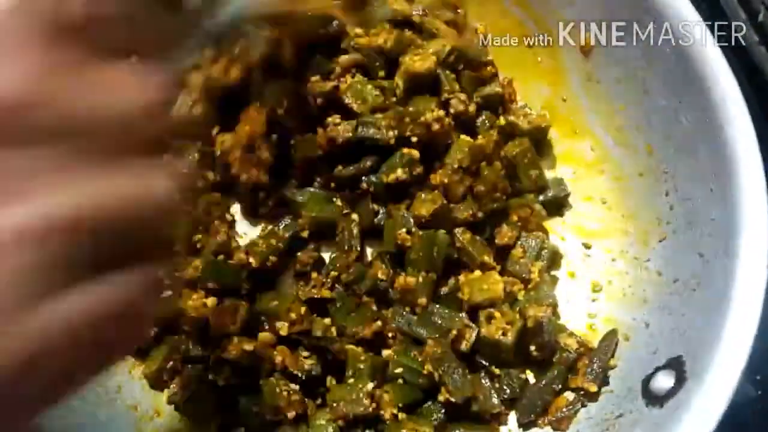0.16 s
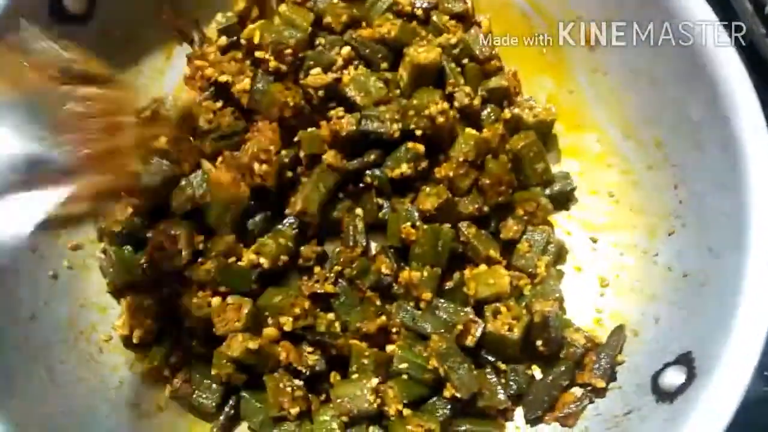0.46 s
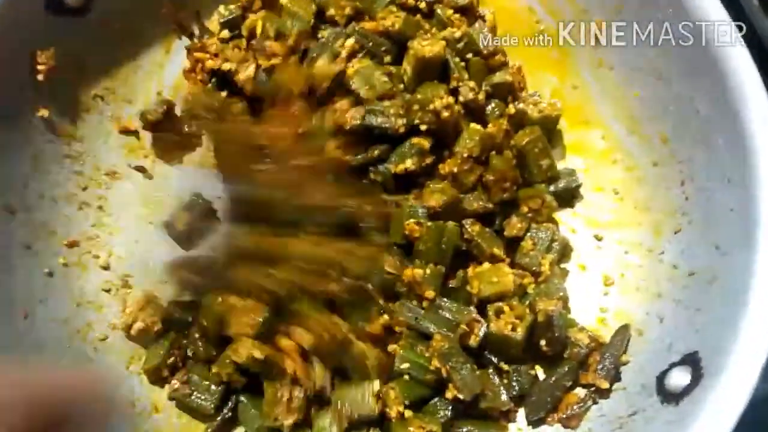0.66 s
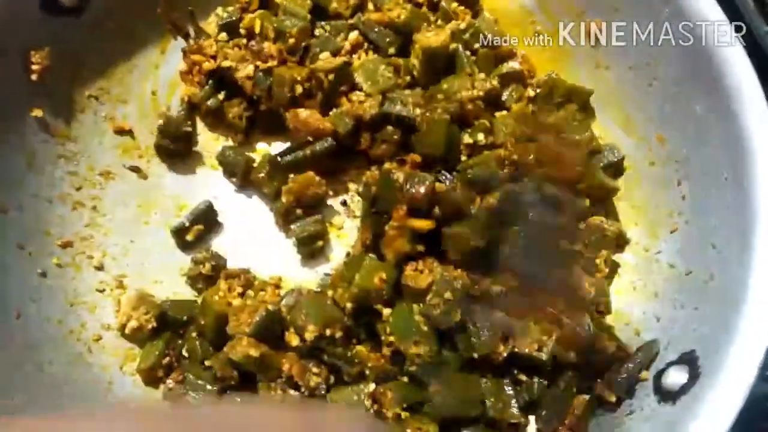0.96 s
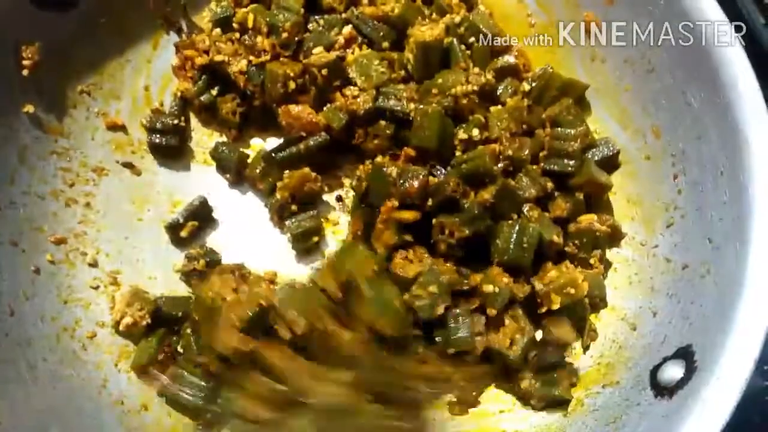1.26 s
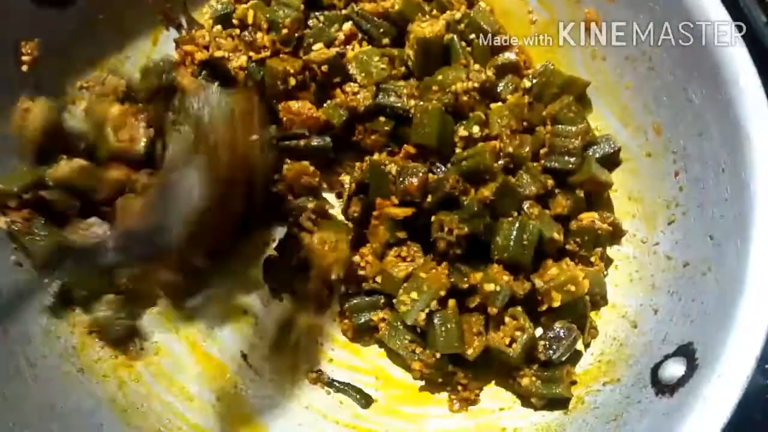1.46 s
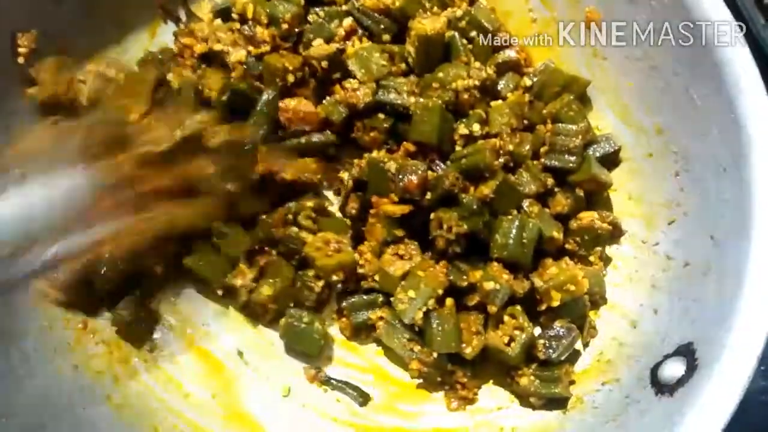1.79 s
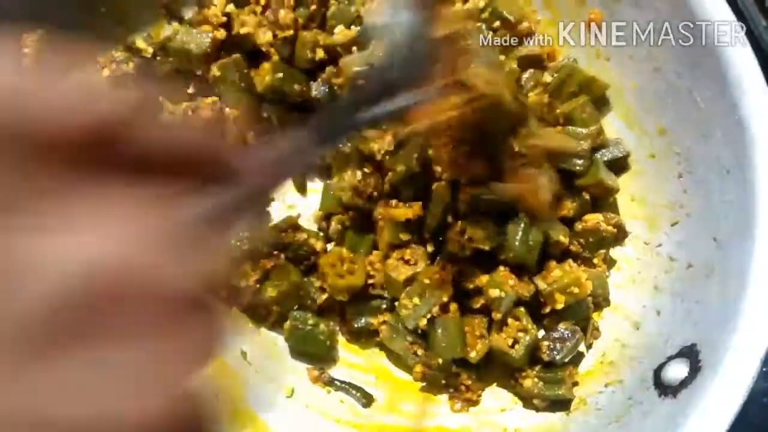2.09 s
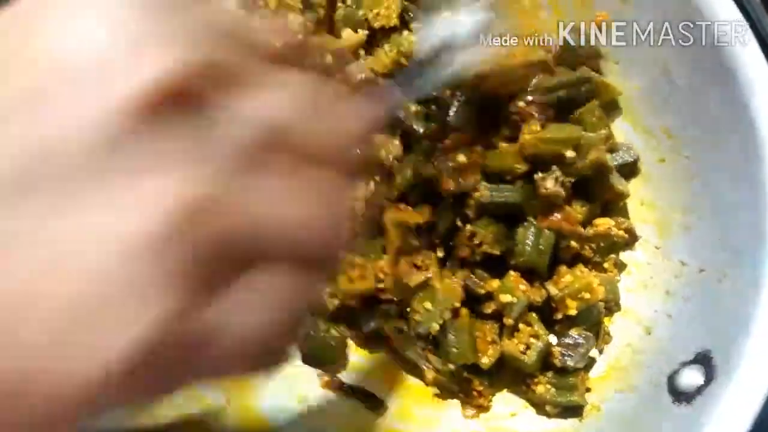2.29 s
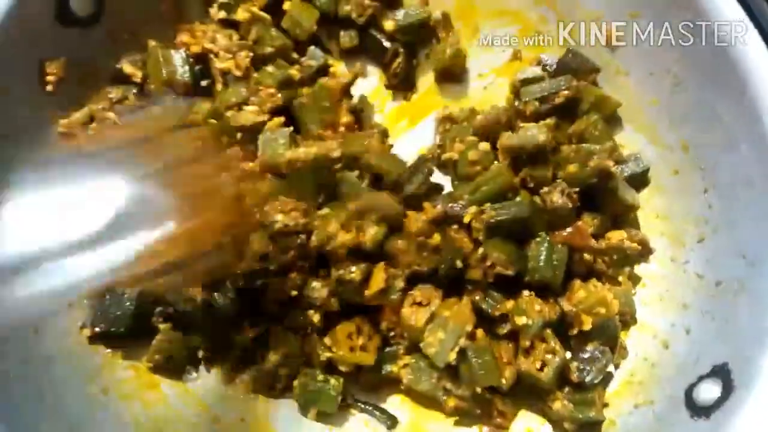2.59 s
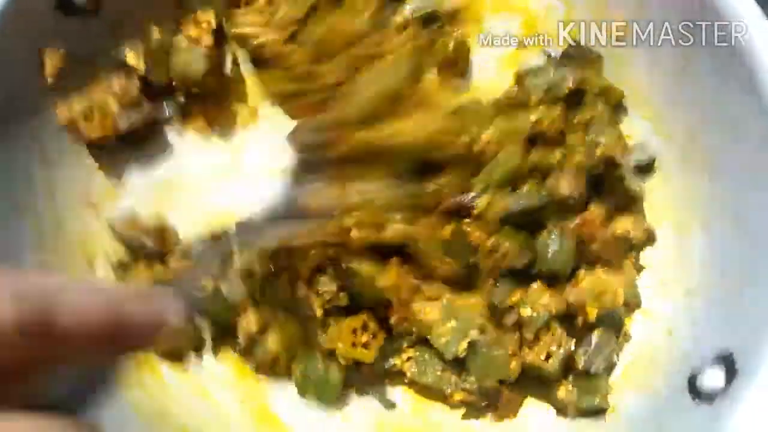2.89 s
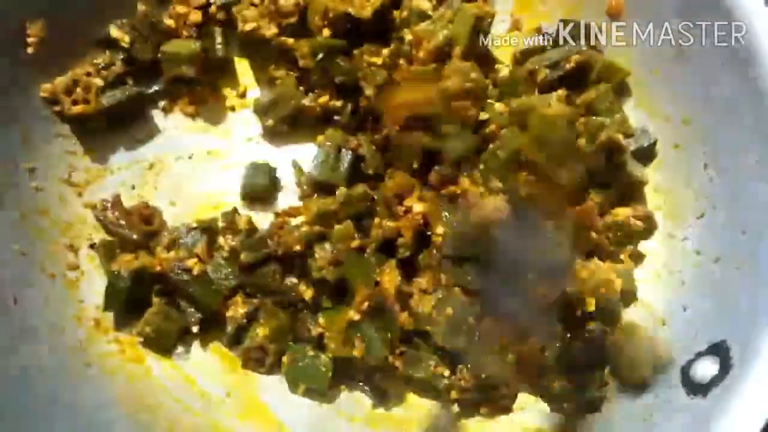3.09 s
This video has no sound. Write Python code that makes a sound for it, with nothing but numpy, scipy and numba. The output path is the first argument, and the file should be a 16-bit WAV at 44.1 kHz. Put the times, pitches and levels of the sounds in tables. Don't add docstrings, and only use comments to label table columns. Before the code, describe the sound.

A steel spoon scrapes and clinks in a thin metal pan, stirring soft chopped vegetables

```python
import sys
import numpy as np
from scipy import signal
from scipy.io import wavfile
from scipy.ndimage import uniform_filter1d
from numba import njit

SR = 44100
rng = np.random.default_rng(int(sys.argv[2]) if len(sys.argv) > 2 else 0)


def convert_level_to_amplitude(level_db):
    exponent = np.asarray(level_db, float) / 20
    return 10 ** exponent


def transcribe(signal):
    frames = np.atleast_2d(signal).T
    limited = np.clip(frames, -1, 1)
    pcm = np.round(limited * 32767).astype(np.int16)
    wavfile.write(sys.argv[1], SR, pcm)


N = 143325


def scrape(t):
    # (time [s], pressure [dB], contact resonance [Hz], spoon brightness [dB])
    stroke_0 = [(0.012, -59.5, 815, 22.5), (0.086, -61.5, 1410, 5.5), (0.1, -46.5, 874, 9.5),
                (.125, -52, 796, 7.5), (0.168, -50, 1780, -1.5), (0.187, -39, 1730, -1)]
    stroke_1 = [(0.192, -36.5, 720, 2.5), (0.239, -38.5, 810, 2.5), (0.261, -32, 1380, -3.5),
                (.315, -33.5, 1290, -4.5), (0.327, -36, 1240, -3.5), (0.343, -26, 1360, -10),
                (.36, -32.5, 1490, -1.5), (0.384, -30, 1390, -7.5), (0.421, -35, 1550, -3.5)]
    stroke_2 = [(0.828, -47, 990, -30), (0.869, -58.5, 980, -5), (0.904, -60, 1960, 8),
                (1.002, -74, 1340, -9)]
    stroke_3 = [(1.321, -72, 1920, 5.1), (1.361, -52.5, 1850, 6.1), (1.451, -60.5, 1730, 2.3),
                (1.479, -46, 780, 5.9), (1.508, -46.5, 723, 1.2), (1.599, -66.5, 795, 1.1)]
    stroke_4 = [(1.951, -30.5, 2020, 1.5), (1.968, -32, 2050, 5), (1.985, -28.5, 2090, -1),
                (2.0, -28, 1980, 0.5), (2.013, -32.5, 2280, 2), (2.023, -30, 3170, 0.5),
                (2.043, -29.5, 1970, -7), (2.058, -38, 1900, 2.5)]
    stroke_5 = [(2.424, -30.5, 1610, -1.5), (2.455, -37, 1390, -7.5), (2.477, -25.5, 1390, -10),
                (2.49, -28, 1450, -1), (2.5, -36.5, 1290, -1.5), (2.515, -35, 1010, 2),
                (2.54, -39, 930, -2.5), (2.552, -38.5, 900, -3.5), (2.577, -44.5, 850, -2)]
    stroke_6 = [(2.912, -34, 890, 7), (2.954, -39, 2070, -3), (2.972, -28.5, 1900, -1.5),
                (2.989, -24.5, 1490, -5), (3.004, -25, 1840, -1), (3.019, -30.5, 1900, 1.5),
                (3.033, -42, 1680, 7.5), (3.05, -47, 1790, 7)]
    # (thud [dB], release [s], settling level [dB], settling time [s])
    food = [
        (-1.5, 0.014, -12.5, 0.06),
        (-14, 0.024, -24.5, 0.3),
        (-11, 0.033, -7.5, 0.054),
        (-11, 0.052, -20, 0.061),
        (-22, 0.023, -29, 0.17),
        (-7.5, 0.01, -28, 0.23),
        (-38, 0.02, -30, 0.16),
    ]
    strokes = (stroke_0, stroke_1, stroke_2, stroke_3, stroke_4, stroke_5, stroke_6)
    grains_per_s, grain_spread_db = 5000, 2.5
    slip_db, slip_rate_hz = 1.2, 190
    contact_q = 3.6
    thud_hz, settle_hz = 505, 8400
    hiss_hz, hiss_db = 4550, -9

    draw = rng.random((3, N))
    grains = draw[0] < grains_per_s / SR
    grit = grains * np.sign(draw[1] - 0.5) * convert_level_to_amplitude(-grain_spread_db * np.log(1 - draw[2]))
    rough = unit(grit) + 0.74 * rng.standard_normal(N)
    force = unit(rough * convert_level_to_amplitude(slip_db * walk(slip_rate_hz)))
    thud = unit(band(band(force, thud_hz, 1.7), thud_hz, 0.5))
    rustle = convert_level_to_amplitude(0.25 * walk(12)) * thin(band(rng.standard_normal(N), settle_hz, 1.0))

    out, edge = np.zeros(N), np.zeros(N)
    for rows, (thud_db, release, settle_db, settle_s) in zip(strokes, food):
        s, db, hz, bright_db = np.array(rows, float).T
        begun = t >= s[0]
        after = np.maximum(t - s[-1], 0)
        contact_hz = np.interp(t, s, hz)
        gain = begun * convert_level_to_amplitude(np.interp(t, s, db)) * np.exp(-after / release)
        bright = gain * convert_level_to_amplitude(np.interp(t, s, bright_db))
        pan, spoon = bodies(s[0])
        shaken = svf(force, contact_hz, contact_q)
        out += thin(through(gain * shaken, pan)) / through(shaken, pan).std()
        out += 0.4 * through(bright * force, spoon)
        out += gain * convert_level_to_amplitude(thud_db) * (1000 / contact_hz) ** 2 * thud
        out += begun * bright.max() * convert_level_to_amplitude(settle_db) * np.exp(-(after / settle_s) ** 2) * rustle
        edge += bright
    return out + convert_level_to_amplitude(hiss_db) * thin(band(edge * force, hiss_hz, 0.82))


def taps():
    # (time [s], peak level [dB], contact resonance [Hz], pan share [dB])
    landings = [(0.012, -47, 4700, -17.5), (0.097, -21, 3630, -9), (.172, -44.5, 6540, -18),
                (0.193, -18, 3460, -0.5), (.226, -24, 3550, 4), (.25, -22.5, 3600, -3),
                (.346, -28, 2200, -12), (.823, -42, 1600, 12.5), (.899, -38.5, 1940, -3.5),
                (1.471, -33, 3640, 8.5), (1.502, -39, 800, -1), (1.952, -10, 2220, -7.5),
                (2.036, -23.5, 2100, 0.5), (2.042, -22, 2500, -11), (2.415, -35, 770, -11),
                (2.422, -14.5, 1530, 0), (2.491, -20.5, 1520, -3), (2.511, -29.5, 2700, 7),
                (2.547, -29.5, 1100, -6), (2.910, -14, 2770, 0.5), (2.934, -13.5, 2560, -21),
                (2.972, -11.5, 1750, -8)]
    knock_q, spoon_db = 4, -7.5
    out = np.zeros(N + SR)
    knock_t = np.arange(300) / SR
    for s, db, hz, pan_db in landings:
        pan, spoon = bodies(s)
        knock = np.sin(2 * np.pi * hz * knock_t) * np.exp(-np.pi * hz / knock_q * knock_t)
        pan_ring = 0.5 * pan + 0.77 * signal.fftconvolve(pan, knock)[:len(pan)]
        hit = convert_level_to_amplitude(pan_db) * pan_ring + convert_level_to_amplitude(spoon_db) * spoon
        hit[:300] += 0.87 * knock
        start = int(s * SR)
        out[start:start + len(hit)] += convert_level_to_amplitude(db) * hit
    return thin(out[:N])


def catches(t):
    # (time [s], mode [Hz], length [s], level [dB])
    blips = [(0.098, 900, 0.0087, -45), (0.185, 1730, .006, -41), (.231, 875, 0.0045, -44),
             (.25, 1200, 0.0035, -33.5), (0.269, 1436, .008, -29.5), (.348, 1220, 0.0046, -26.5),
             (0.37, 1900, 0.011, -31.5), (.393, 1160, 0.0027, -26), (1.964, 900, 0.01, -33.5),
             (1.999, 1100, 0.0082, -30.5), (2.045, 1900, 0.0042, -22), (2.065, 1100, 0.0031, -37),
             (2.49, 1180, .004, -30), (2.511, 3550, 0.0026, -31), (2.548, 3490, .003, -36),
             (2.574, 3420, .003, -40.5), (2.915, 900, 0.0092, -30.5), (2.988, 1100, 0.0036, -26.5),
             (2.994, 1840, 0.0033, -21), (3.006, 1850, 0.0036, -22), (3.07, 1810, 0.0042, -34),
             (3.088, 1870, 0.011, -49)]
    tick_glide = 0.13
    out = np.zeros(N)
    for s, hz, length, db in blips:
        d = (t - s) / length
        swell = np.exp(-np.where(d < 0, 2.06 * d ** 2, 1.16 * np.abs(d) ** 0.96))
        glide = 1 + (hz > 3000) * tick_glide * d / 2
        out += convert_level_to_amplitude(db) * np.sqrt(2) * swell * np.sin(2 * np.pi * hz * (t - s) * glide)
    return out


def rim(t):
    # (time [s], rise [s], mode [Hz], level [dB])
    rings = [(.44, 0.041, 1904, -37), (.45, 0.041, 1900, -55), (.45, 0.027, 1226, -52.5),
             (.46, .03, 1238, -66), (.43, 0.011, 684, -56), (1.33, 0.022, 1905, -53.5),
             (2.05, 0.0087, 1900, -52), (2.576, 0.035, 1225, -44), (2.6, 0.045, 690, -62.5),
             (3.02, 0.012, 684, -55), (3.035, 0.0083, 1908, -51)]
    # (mode [Hz], 60 dB decay [s])
    rim_decay = [(684, 0.92), (1222, 1.32), (1787, 0.16), (1900, 0.51)]
    waver_db = 1.5
    out = 0
    f, t60 = np.array(rim_decay).T
    for s, rise, hz, db in rings:
        d = np.maximum(t - s, 0)
        swell = np.sin(np.pi / 2 * np.minimum(d / rise, 1)) ** 2
        decay = np.exp(-np.log(1000) * np.maximum(d - rise, 0) / np.interp(hz, f, t60))
        waver = convert_level_to_amplitude(waver_db * walk(39.67))
        out = out + convert_level_to_amplitude(db) * np.sqrt(2) * swell * decay * waver * np.sin(2 * np.pi * hz * d)
    return out


def bodies(s):
    # (mode [Hz], width [Hz], first four strokes [dB], 5th
    # [dB], 6th [dB], 7th [dB])
    pan_modes = [(900, 88, 5, 3.5, 1, -4), (1100, 70, -8, -4.5, -1.5, -4.5), (1160, 20, -4, -12, -6, -22),
                 (1381, 70, -5, -26, -4.5, -15.5), (1794, 34, -1, -3, -0.5, -4.5),
                 (1900, 53, 5.5, -1, 1.5, -7.5), (2135, 41, -3, -1.5, -14, -5.5),
                 (2264, 59, -11.5, -7.5, -2, -7), (2440, 70, 0, -11.5, -3, -5),
                 (2620, 65, -5, -12, -4.5, -6), (3160, 88, -3, -7.5, -3, -10.5),
                 (3480, 180, -6.5, -3.5, -6, -24)]
    food_shifts = [1.7, 2.3, 2.8]
    # (mode [Hz], width [Hz], level [dB])
    spoon_flat = [(2850, 66, -0.5), (3550, 44, 4.5), (4597, 177, 0.5), (5900, 20, 1), (6480, 46, -2),
                  (8230, 210, -3), (9450, 51, -1.5), (11200, 48, -6.5), (13100, 24, -4)]
    # (mode [Hz], width [Hz], level [dB])
    spoon_edge = [(4087, 55, -7), (3630, 9.1, -3), (4690, 160, -2), (5450, 55, 0.5), (6325, 115, -4),
                  (7050, 21, -0.5), (7940, 860, -10), (12600, 43, -24)]
    pan_dense_t60_s, pan_dense_db = 0.09, -3
    spoon_dense_t60_s, spoon_dense_db, spoon_tilt_db = 0.13, -6.5, 12

    a, b, c = rng.random((3, 200))
    level_column = 2 + np.searchsorted(food_shifts, s)
    pan = resonances(np.array(pan_modes)[:, [0, 1, level_column]])
    pan = pan + convert_level_to_amplitude(pan_dense_db) * body(600 * 7 ** a, pan_dense_t60_s * (0.4 + b), 7 * c)
    spoon = resonances(spoon_flat if s < 1.7 else spoon_edge)
    thicket = body(2600 * 5 ** b, spoon_dense_t60_s * (0.9 + a), 10 * c - spoon_tilt_db * b)
    spoon = spoon + convert_level_to_amplitude(spoon_dense_db) * thicket
    return pan / np.linalg.norm(pan), spoon / np.linalg.norm(spoon)


def resonances(peaks):
    grip_db = 2
    hz, width, db = np.array(peaks, float).T
    a, b = rng.standard_normal((2, len(hz)))
    t60 = np.log(1000) / np.pi / np.maximum(width, 25)
    return body(hz * (1 + a / 500), t60, db + grip_db * b + 10 * np.log10(width))


def body(hz, t60, db):
    t = np.arange(SR // 5)[:, None] / SR
    sign = np.sign(rng.standard_normal(len(hz)))
    decay = np.exp(-np.log(1000) * t / t60)
    ir = (sign * convert_level_to_amplitude(db) / np.sqrt(t60) * np.sin(2 * np.pi * hz * t) * decay).sum(axis=1)
    return ir / np.linalg.norm(ir)


def through(x, ir):
    return signal.fftconvolve(x, ir)[:N]


def thin(x):
    return signal.sosfilt(signal.butter(4, 616, "high", fs=SR, output="sos"), x)


@njit
def walls(x, lags, gain, damp):
    line, soft, out = np.zeros((8, 4096)), np.zeros(8), np.zeros(len(x))
    for i in range(len(x)):
        total = 0.
        for k in range(8):
            soft[k] += (1 - damp) * (gain[k] * line[k, (i - lags[k]) & 4095] - soft[k])
            total += soft[k]
            out[i] += soft[k] * (1 - 2 * (k % 2))
        for k in range(8):
            line[k, i & 4095] = x[i] + soft[k] - total / 4
    return out


def kitchen(t):
    # (frequency [Hz], density [dB per Hz])
    room_noise = [(50, -6), (195, -4.5), (370, -19), (815, -4.5), (2200, -13.5), (3600, -29), (6000, -32.5),
                  (14000, -35.5)]
    # (time [s], level [dB])
    hum_levels = [(.1, -67), (.35, -74), (.8, -67), (1.15, -80.5), (1.35, -66), (1.6, -66), (1.8, -77),
                  (2.05, -67), (2.55, -77), (2.85, -65), (3.2, -83)]
    # (time [s], frequency [Hz], length [s], level
    # [dB])
    thumps = [(.01, 266, 0.13, -53.5), (0.559, 262, 0.033, -53), (.77, 268, 0.033, -59.5),
              (0.77, 194, 0.04, -55), (0.857, 274, 0.08, -60), (1.075, 193, 0.18, -62),
              (1.374, 191, 0.059, -60.5), (1.364, 340, 0.025, -58), (1.368, 470, .03, -56),
              (1.56, 176, 0.17, -63), (2.208, 235.4, 0.033, -55.5), (2.537, 322, 0.15, -55),
              (2.84, 176, .07, -59.5), (2.949, 274, 0.092, -62), (3.1, 181, 0.076, -57.5),
              (1.48, 331, 0.13, -56.5)]
    noise_db, hum_hz, hum_wobble_db = -62.5, 50.4, 1.5

    noise, (f, level_db) = 0, np.array(room_noise).T
    for hz in 48 * 2 ** np.arange(0, 8.3, 1 / 3):
        db = np.interp(np.log(hz), np.log(f), level_db) + 10 * np.log10(hz) + 1.4 * walk(6.82)
        noise = noise + convert_level_to_amplitude(db) * unit(band(band(rng.standard_normal(N), hz, 3.05), hz, 3.05))
    hum_db = np.interp(t, *np.array(hum_levels).T) + hum_wobble_db * walk(9.0)
    hum = convert_level_to_amplitude(hum_db) * np.sqrt(2) * np.sin(2 * np.pi * hum_hz * t + 0.86 * walk(4.4))
    out = unit(noise) * convert_level_to_amplitude(noise_db) + hum
    for s, hz, length, db in thumps:
        swell = np.exp(-((t - s) / length * 2) ** 2)
        out += convert_level_to_amplitude(db) * np.sqrt(2) * swell * np.sin(2 * np.pi * hz * t + 1.7 * walk(60))
    return out


def unit(x):
    return x / np.sqrt(np.mean(x ** 2))


@njit
def svf(x, hz, q):
    y, b, l, k = np.empty(len(x)), 0., 0., 1 / q
    for i in range(len(x)):
        g = np.tan(np.pi * hz[i] / SR)
        v = (b + g * (x[i] - l)) / (1 + g * (g + k))
        b, l, y[i] = 2 * v - b, l + 2 * g * v, k * v
    return y


def band(x, hz, q):
    return svf(x, np.full(N, 1. * hz), 1. * q)


def walk(rate):
    k = int(SR / rate)
    held = np.repeat(rng.standard_normal(N // k + 1), k)
    return 1.2 * uniform_filter1d(uniform_filter1d(held, k), k)[:N]


def scene():
    room_t60_s, room_damp, room_db = 0.52, 0.22, -21.5
    t = np.arange(N) / SR
    near = scrape(t) + taps() + catches(t) + rim(t)
    lags = rng.integers(350, 1900, 8)
    echo = walls(near + 1e-18, lags, convert_level_to_amplitude(-60 * lags / SR / room_t60_s), room_damp)
    return (near + convert_level_to_amplitude(room_db) * echo + kitchen(t))[None]


def band_limit(x):
    return signal.sosfilt(signal.butter(12, 15610, fs=SR, output="sos"), x)


def record(dry):
    top_cut = signal.ellip(12, 0.2, 70, 14250, fs=SR, output="sos")
    mix = signal.sosfilt(top_cut, dry)
    return band_limit(mix)


dry = scene()
out = record(dry)
transcribe(out)
```